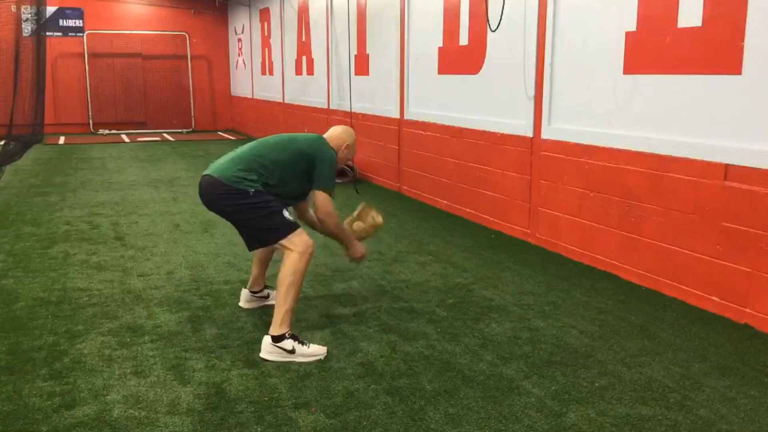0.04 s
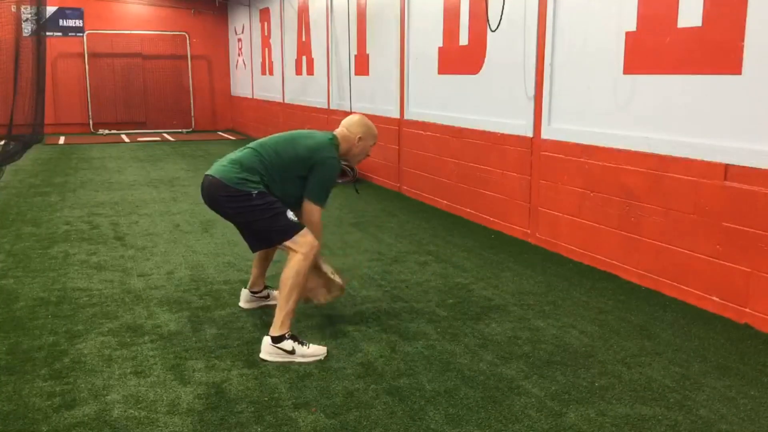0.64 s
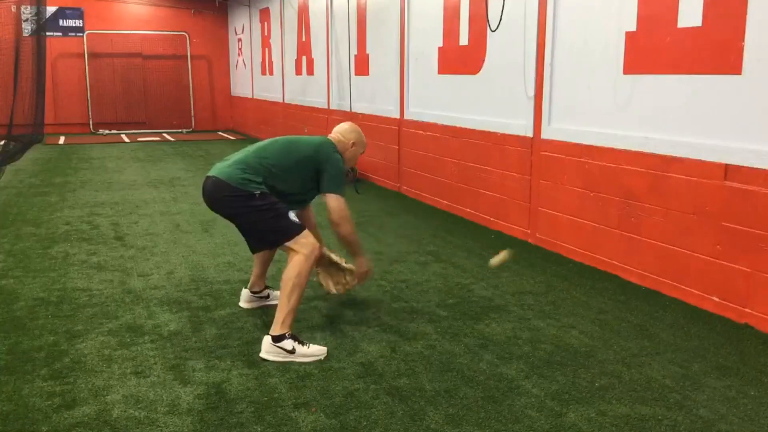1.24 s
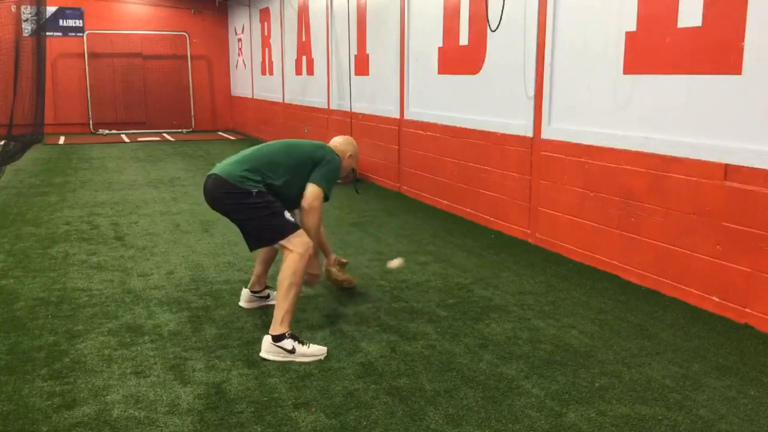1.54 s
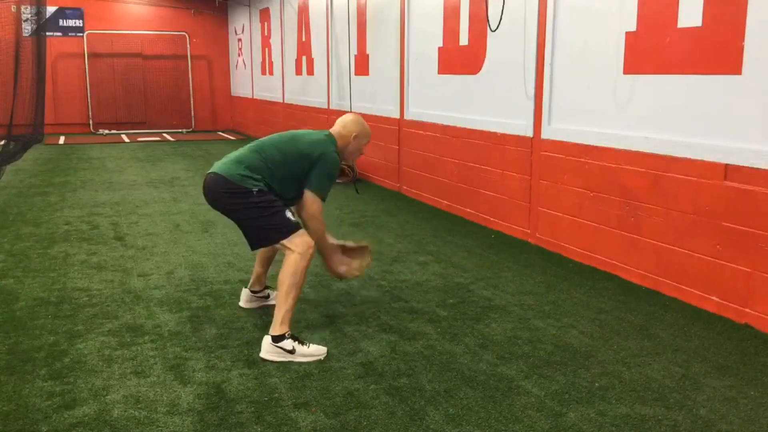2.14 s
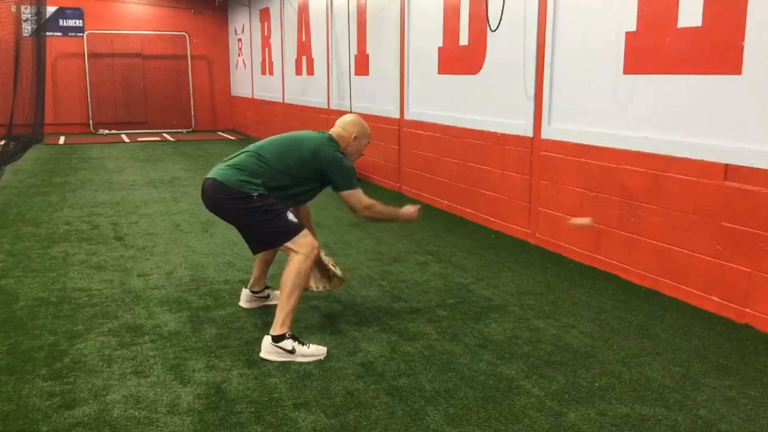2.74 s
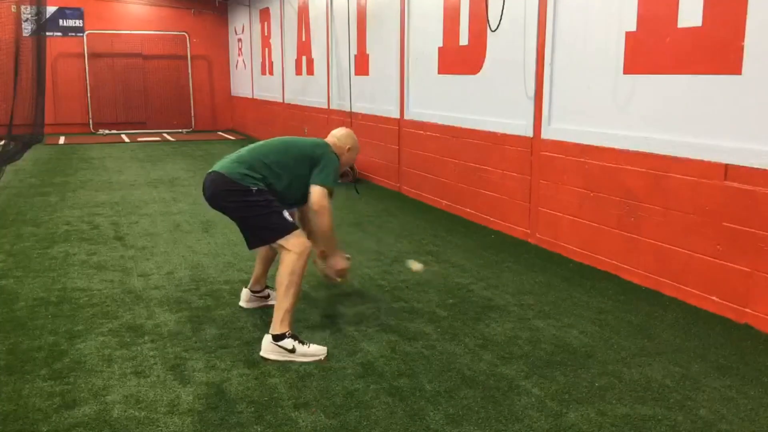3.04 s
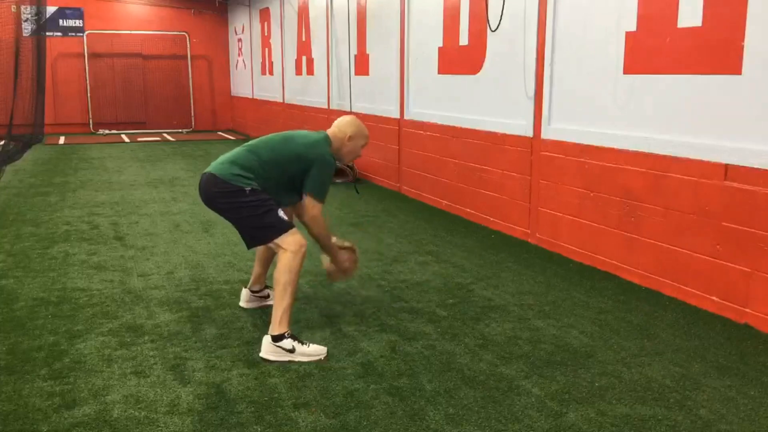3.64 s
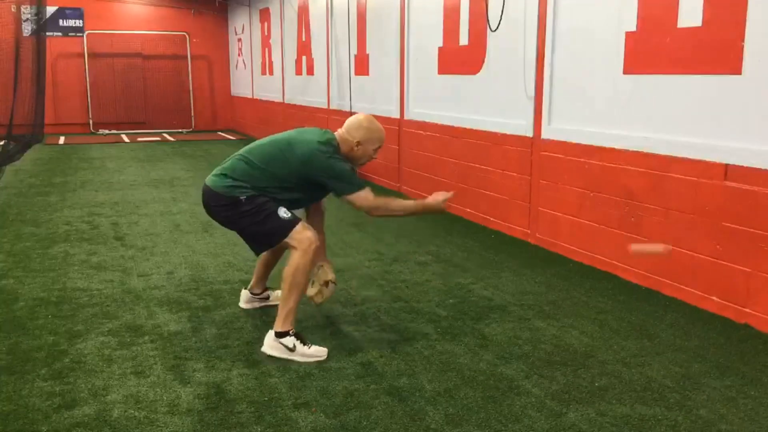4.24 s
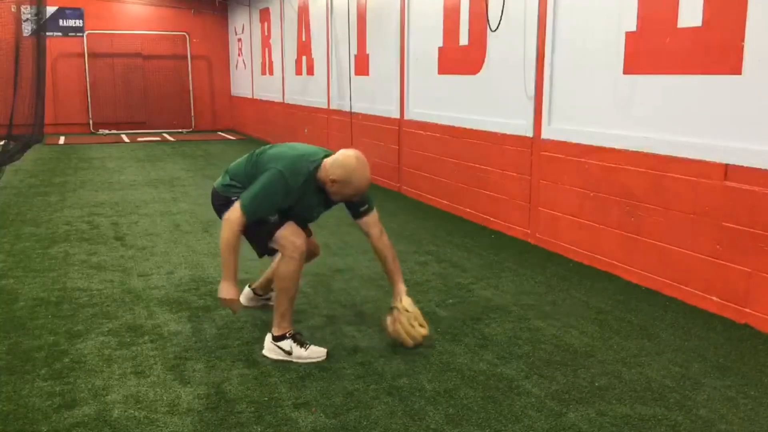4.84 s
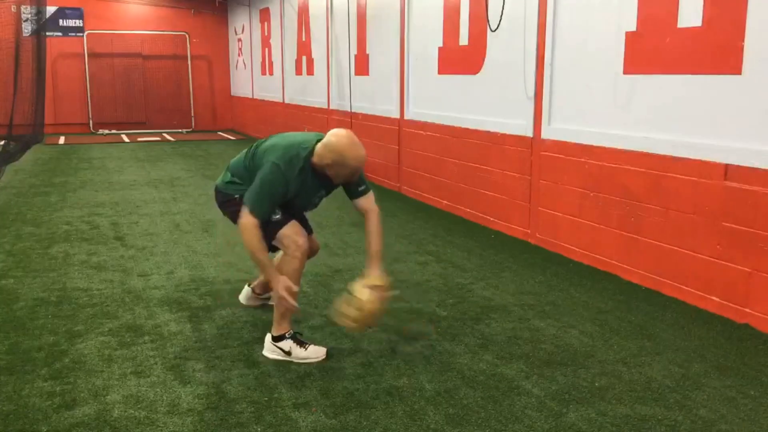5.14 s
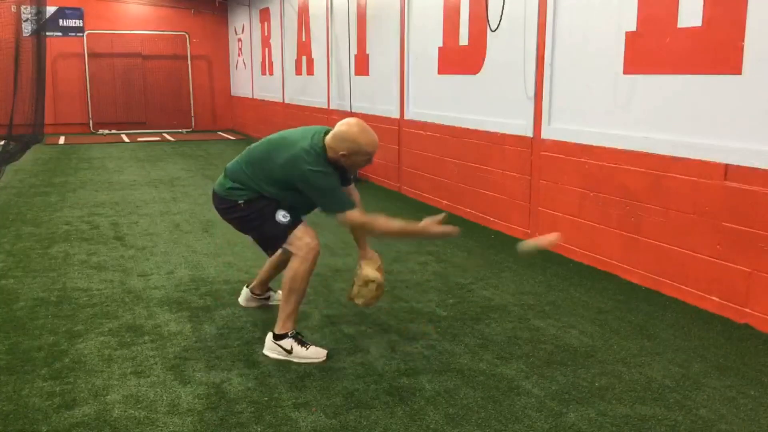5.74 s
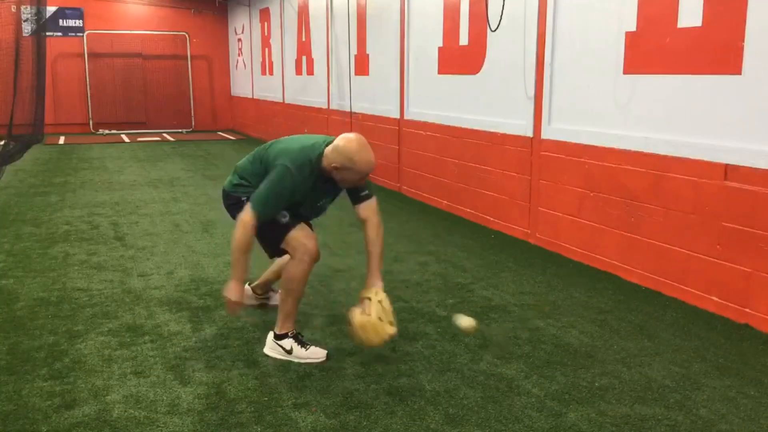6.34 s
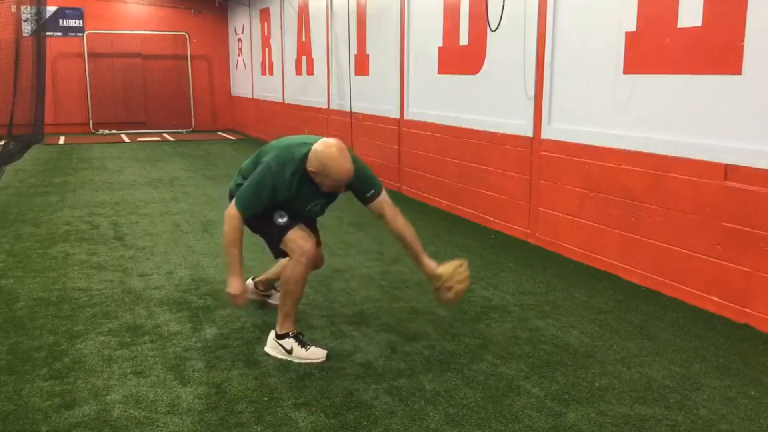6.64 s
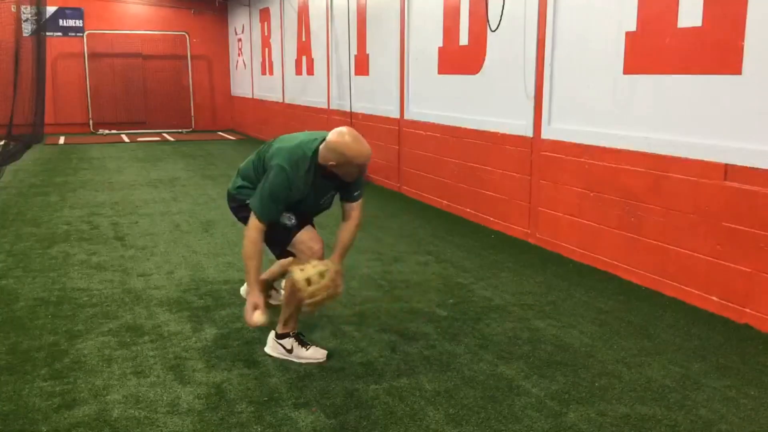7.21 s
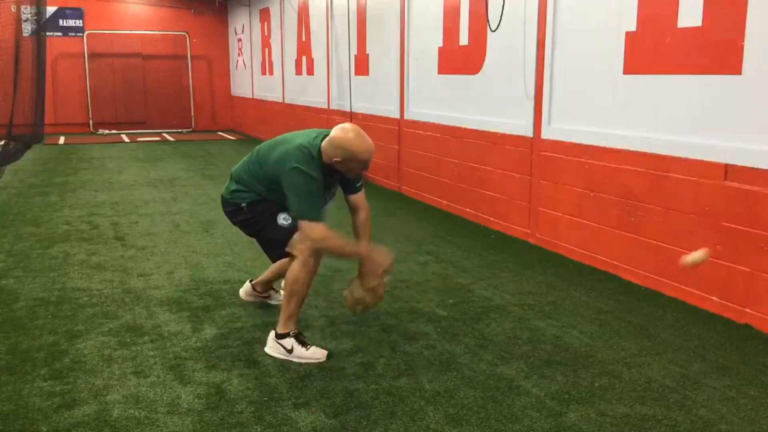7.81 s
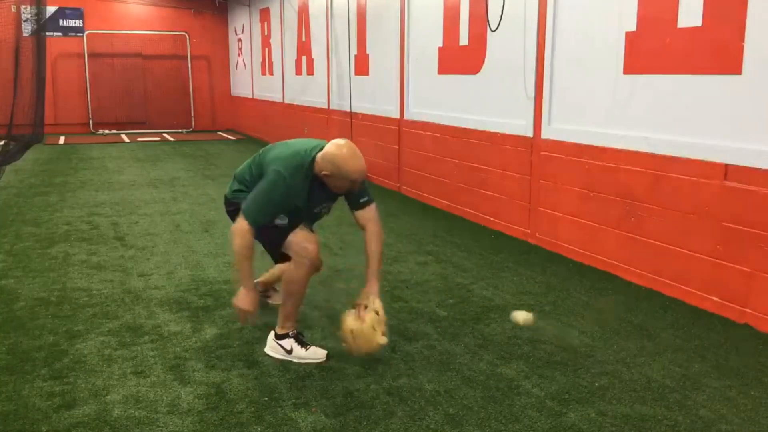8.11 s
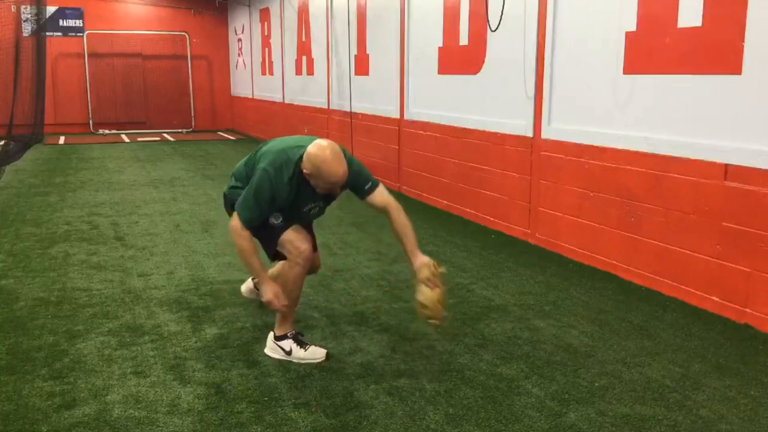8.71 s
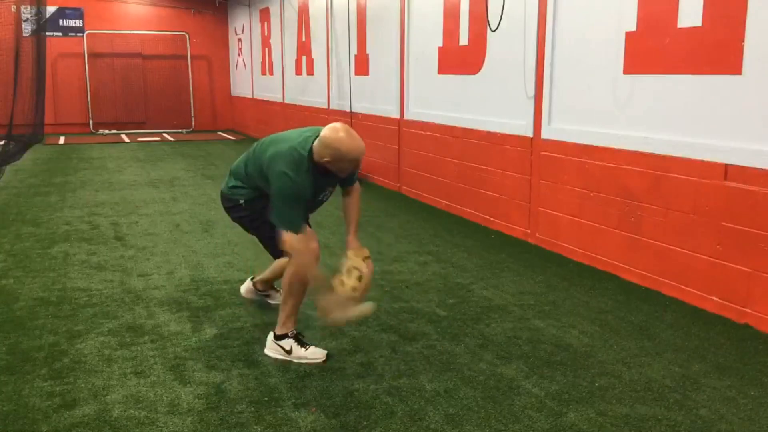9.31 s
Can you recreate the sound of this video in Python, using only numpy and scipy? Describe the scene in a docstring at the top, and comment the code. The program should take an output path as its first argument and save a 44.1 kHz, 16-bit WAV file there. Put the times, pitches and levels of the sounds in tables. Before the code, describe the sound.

A baseball cracks against a block wall five times, skipping off turf and smacking into a leather glove in an echoing indoor hall.

```python
"""A man throws a baseball five times at a block wall in an indoor training hall and fields it.
Ventilation rumbles throughout. First his fingers pat the ball in the glove and the leather creaks.
Each throw cracks on the wall and excites the modes of its hollow blocks; the hall rings for about
a second over a deep boom. The ball skips off artificial turf, his clothes rustle as he moves,
and the ball smacks into the pocket of the glove, from which he takes it out again."""
import sys
import numpy as np
from scipy import signal
from scipy.fft import rfft, irfft
from scipy.io import wavfile
from scipy.ndimage import uniform_filter1d

SR = 44100
rng = np.random.default_rng(int(sys.argv[2]) if len(sys.argv) > 2 else 0)


def master(y):
    """Save y as 16-bit WAV."""
    cut = np.clip(np.atleast_2d(y).T, -1, 1)
    pcm = np.round(cut * 32767)  # scale
    wavfile.write(sys.argv[1], SR, pcm.astype(np.int16))


N = 421590

# Impacts on the wall: start_s, thud_db, thud_hz, clack_db, clack_hz, crack_db,
# crack_tilt_db_per_octave, boom_db, tuning_ratio
THROWS = [(1.0191, -16.5, 246, -20, 1170, -38, -0.5, -51, 0.95),
          (2.7010, -13, 297, -15.5, 1990, -34.5, 0.26, -61, 0.99),
          (4.2609, -13, 153.6, -18.5, 1180, -34.5, 0, -50.5, 1.027),
          (5.901, -9, 110, -4.5, 1870, -31, -0.6, -44.5, .98),
          (7.7211, -14, 165, -14.5, 1250, -34, -0.6, -45, 1.02)]
# Spectrum of a contact with leather: frequency_hz, level_db
LEATHER = [(50, -10), (220, 8), (600, -3.5), (1500, -10.5), (2600, -17.5), (3600, -17), (5000, -17),
           (12000, -19.5), (16000, -38)]


def amp(db):
    """Amplitude ratio of a level in decibels."""
    return 10 ** (np.asarray(db) / 20)


def unit(x):
    """Normalisation to an rms of 1."""
    return x / np.sqrt(np.mean(x ** 2) + 1e-20)


def curve_at(points, hz):
    """Interpolation of (frequency_hz, value) points on a logarithmic frequency axis."""
    frequencies, values = np.transpose(points)
    return np.interp(np.log(hz + 1), np.log(frequencies + 1), values)


def fade(t, t60):
    """Exponential decay by 60 dB in t60 seconds."""
    return np.exp(-np.log(1000) * t / np.maximum(t60, 1e-3))


def seconds(length_s):
    """A sampled time axis."""
    return np.arange(int(length_s * SR)) / SR


def add(mix, start_s, sound):
    """Superposition: a sound sums into the mix from start_s on."""
    part = mix[max(round(start_s * SR), 0):][:len(sound)]
    part += sound[:len(part)]


def grain(count, depth_db, width):
    """Log-normal modulation: a random gain that varies over about width samples."""
    return amp(depth_db * unit(uniform_filter1d(rng.standard_normal(count), size=width)))


def colour(x, spectrum, shading=((100, 0), (1000, 0)), size=4096):
    """Minimum-phase filtering by a spectrum of unit energy times a shading curve."""
    hz = abs(np.fft.fftfreq(size, 1 / SR))
    gain = unit(amp(curve_at(spectrum, hz))) * amp(curve_at(shading, hz))
    taps = np.fft.ifft(np.exp(np.conj(signal.hilbert(np.log(gain))))).real
    return signal.fftconvolve(x, taps[:size // 2])


def shade(db_per_octave, peak_hz=1000, peak_db=0, octaves=1):
    """Spectral tilt about 1 kHz plus one damped resonance, as rows of frequency_hz, level_db."""
    hz = np.geomspace(20, SR / 2, num=200)
    tilt = db_per_octave * np.log2(np.clip(hz, 125, 8000) / 1000)
    resonance = peak_db / (1 + (np.log2(hz / peak_hz) / octaves) ** 2)
    return np.c_[hz, tilt + resonance]


def ring(modes, near_hz=1000, db_per_octave=0):
    """Free vibration: a sum of damped modes, weighted by their distance from near_hz."""
    t = seconds(.15)
    return sum(amp(db - db_per_octave * abs(np.log2(hz / near_hz)))
               * np.sin(2 * np.pi * hz * t) * fade(t, t60) for hz, db, t60 in modes)


def crush(rise_s, t60, grit_db=0):
    """Contact noise: countless tiny slips build up and die away, clumped by the grit."""
    t = seconds(.25)
    clumps = grain(len(t), grit_db, width=40)
    push = np.minimum(t / max(rise_s, 1e-4), 1) * fade(np.maximum(t - rise_s, 0), t60)
    spectrum = rfft(rng.standard_normal(len(t)) * push * clumps)
    spectrum /= np.sqrt(uniform_filter1d(abs(spectrum) ** 2, size=61) + 1e-12)  # whitening
    gate = np.minimum(t / max(rise_s / 2, 1e-4), 1) * (t < t60 * 2)
    return irfft(spectrum, len(t)) * np.linalg.norm(push) * gate


def scuff(rise_s, t60, grit_db, count=22):
    """Rough friction: among the tiny slips a few larger ones catch, each ringing at its own pitch."""
    fine, t = crush(rise_s, t60, grit_db), seconds(.02)
    coarse = np.zeros(len(fine))
    for when, pitch, size in rng.random((count, 3)):
        hz, start_s = 1100 + 5000 * pitch ** 1.4, when * (rise_s + t60 / 3)
        push = min(start_s / rise_s, 1) * fade(max(start_s - rise_s, 0), t60)
        ping = np.sin(2 * np.pi * hz * t) * fade(t, .008) * np.minimum(t * hz / 2, 1)
        add(coarse, start_s, push * amp(9 * size) * ping)
    return fine + .6 * coarse * np.linalg.norm(fine) / np.linalg.norm(coarse)


def ventilation(air_db=-68, waver=0.99):
    """Broadband rumble and hiss of air, with fan tones modulated slowly in amplitude and phase."""
    # Spectrum of the moving air: frequency_hz, level_db
    air_spectrum = [(15, -68.5), (27, -30.5), (45, -10.5), (78, -2), (145, -6), (166, -9), (301, -13.5),
                    (344, -12.5), (476, -25.5), (591, -21.5), (936, -32), (1230, -32.5), (2220, -37),
                    (13200, -45.5), (16000, -65.5)]
    # Fan tones before modulation: pitch_hz, level_db
    fan_tones = [(64.6, -79), (274.5, -88), (592, -100)]
    hz, t = np.fft.rfftfreq(N, 1 / SR), np.arange(N) / SR
    air = irfft(rfft(rng.standard_normal(N)) * amp(curve_at(air_spectrum, hz)), N)
    out = amp(air_db) * unit(air)
    for pitch_hz, db in fan_tones:
        drift = unit(irfft(rfft(rng.standard_normal(N)) * np.exp(-hz / 2), N))
        out += amp(db) * np.sqrt(2) * np.sin(2 * np.pi * pitch_hz * t + drift) * (1 + waver * drift)
    return out


def hand():
    """Friction with one damped resonance: fingers pat the glove and pull the ball out."""
    # Touches on ball and leather: start_s, level_db, t60_s, tilt_db_per_octave, pat_hz
    grips = [(0.270, -69, 0.03, -3, 1230), (2.012, -66.5, 0.09, -0.5, 3500), (3.515, -69, 0.063, -4, 1310),
             (3.562, -64.5, 0.1, -4, 360), (5.190, -67.5, 0.092, -4, 1300), (5.221, -71.5, .06, .5, 3700),
             (6.949, -77.5, 0.13, -1, 3490), (6.996, -68.5, 0.24, -1, 402.4), (8.956, -67.5, .07, 1, 2940)]
    out = np.zeros(N)
    for start_s, db, t60, tilt, pat_hz in grips:
        pat = scuff(rise_s=0.02, t60=t60, grit_db=4)
        shading = shade(tilt, pat_hz, peak_db=8.5, octaves=0.4)
        add(out, start_s, amp(db) * colour(pat, LEATHER, shading))
    return out


def creaks(slips_per_s=630):
    """Stick-slip friction of leather on the ball: each uneven slip rings the laces."""
    # Bursts of slipping: start_s, level_db, length_s, strongest_hz
    bursts = [(0.298, -87, .025, 5400), (2.015, -70, 0.0065, 4460), (2.032, -77.5, 0.026, 5050),
              (2.038, -75, .045, 3450), (3.227, -61.5, .012, 3570), (4.869, -68, 0.0076, 4100),
              (5.224, -71.5, 0.013, 4060), (6.44, -75, 0.013, 4460), (8.951, -65.5, 0.0036, 5170),
              (8.959, -73, 0.01, 5430), (8.988, -83, 0.029, 3350)]
    # Modes of laces and leather: pitch_hz, level_db, t60_s
    lace_modes = [(3480, 8, 0.013), (4060, 1.5, 0.011), (4560, -4.5, 0.0079), (4930, -1.5, .009),
                  (6100, 0.5, .006)]
    out = np.zeros(N)
    for start_s, db, length_s, strongest_hz in bursts:
        slips = np.zeros(int(length_s * SR))
        when, size = rng.random((2, int(length_s * slips_per_s) + 1))
        slips[(when * len(slips)).astype(int)] = .5 + size
        laces = np.diff(ring(lace_modes, strongest_hz, db_per_octave=29), prepend=0)
        creak = signal.fftconvolve(slips, laces)
        add(out, start_s, amp(db) * np.sqrt(len(slips)) * creak / np.linalg.norm(creak))
    return out


def hollow_blocks(t, thud_db, thud_hz, clack_db, clack_hz, tuning, swell_cycles=0.28):
    """Modal excitation: the struck spot favours the modes near its thud and its clack."""
    # Modes of the wall before tuning: pitch_hz, level_db, t60_s
    wall_modes = [(91.7, -10, 0.025), (136.7, -4, 0.052), (173, -2, 0.034), (212.3, -0.5, 0.043),
                  (264.3, 2, 0.033), (312.7, -6.5, 0.06), (561.6, -8.5, 0.076), (724, -21, 0.14),
                  (950, -20, 0.025), (1203, -10, 0.023), (1297, -16.5, 0.0352), (1432, -10, 0.016),
                  (1581, -22.5, 0.026), (1755, -22.5, 0.026), (2135, -20, 0.039)]
    out = np.zeros(len(t))
    for hz, db, t60 in wall_modes:
        thud_db_per_octave = 7 if hz > thud_hz else 10.5
        thud = amp(thud_db - thud_db_per_octave * abs(np.log2(hz / thud_hz)))
        clack = amp(clack_db - 13 * abs(np.log2(hz / clack_hz)))
        swell = 1 - np.exp(-t * hz / swell_cycles)
        mode = swell * np.sin(2 * np.pi * hz * tuning * t) * fade(t, t60)
        lag_s = 0.0017 * np.sqrt(200 / hz)  # dispersion: low bending waves travel more slowly
        add(out, lag_s, amp(db) * np.hypot(thud, clack) * mode)
    return out


def wall(rise_s=0.0012, lead_s=.0055, radiate_hz=95):
    """Impact: the ball cracks on the paint and rings, and the blocks knock. Returns knocks, cracks."""
    # Spectrum of the ball's crack: frequency_hz, level_db
    crack_spectrum = [(30, -23.5), (90, -15), (200, -3), (650, 4), (1500, -5), (2500, -15.5), (3500, -18),
                      (5500, -19), (8000, -24), (11500, -23), (16000, -38.5)]
    # Modes of the ball, relative to the crack: pitch_hz, level_db, t60_s
    ball_modes = [(1290, -9, .018), (2480, -13, 0.027), (2694, -13.5, 0.014), (3080, -17, 0.025),
                  (3446, -14.5, .028), (4210, -20, .03)]
    knocks, cracks, t = np.zeros(N), np.zeros(N), seconds(.2)
    for start_s, thud_db, thud_hz, clack_db, clack_hz, crack_db, tilt, _, tuning in THROWS:
        blocks = hollow_blocks(t, thud_db, thud_hz, clack_db, clack_hz, tuning)
        add(knocks, start_s, blocks)
        chatter = crush(rise_s, t60=0.063, grit_db=3)
        slap = amp(6) * crush(rise_s, t60=0.0048)
        crack = colour(chatter + slap, crack_spectrum, shade(tilt))[:len(t)]
        add(crack, rise_s, ring(ball_modes))
        crack *= amp(crack_db)
        add(cracks, start_s, crack)
        # the fastest waves in the wall arrive ahead of the airborne sound
        precursor = (blocks + crack) * np.minimum(t / lead_s, 1) * fade(t, t60=0.048)
        add(knocks, start_s - lead_s, amp(-11) * precursor)
    # a small patch of wall radiates little deep bass
    radiation = signal.butter(2, radiate_hz, "highpass", fs=SR, output="sos")
    return signal.sosfilt(radiation, knocks), cracks


def boom(build_s=0.042):
    """Room resonance: pumped by the flexing wall, the deepest standing waves swell and hang on."""
    # Lowest modes of the hall: pitch_hz, level_db, t60_s
    room_modes = [(39, -12.5, 1.1), (53.6, -5, 1.2), (63.4, -2.5, 1.2), (98.2, 3, 1.6)]
    out, t = np.zeros(N), seconds(1.5)
    for start_s, *_, boom_db, _ in THROWS:
        for (hz, db, t60), phase in zip(room_modes, rng.random(len(room_modes))):
            envelope = np.minimum(t / build_s, 1) * fade(t, t60)
            add(out, start_s, amp(boom_db + db) * np.sin(2 * np.pi * (hz * t + phase)) * envelope)
    return out


def hall_tail(build_s=0.0054):
    """Impulse response of a diffuse field: the treble dies first and low standing waves remain."""
    # Reverberation time: frequency_hz, t60_s
    decay_times = [(60, 0.95), (200, 0.97), (500, 0.98), (1400, 0.93), (3500, 0.75), (6000, 0.84),
                   (10000, 0.56), (16000, 0.32)]
    # Strength of the diffuse field: frequency_hz, level_db
    tail_spectrum = [(50, -5), (120, 9.5), (300, 2.5), (450, -1.5), (600, 2), (1300, -3), (2100, 0),
                     (2800, 2), (8000, -3), (15000, -5)]
    # Standing waves: pitch_hz, level_db
    standing_waves = [(122, -68), (156, -59), (200, -73.5), (250, -60.5), (312, -71.5), (337, -67.5)]
    t = seconds(1.8)
    reflections = rng.standard_normal(len(t)) * grain(len(t), depth_db=2.0, width=60)
    hz, frame_s, bands = signal.stft(unit(reflections), SR, nperseg=512)
    t60 = np.maximum(curve_at(decay_times, hz), .1)[:, None]
    decay = fade(frame_s, t60) * np.sqrt(2 * np.log(1000) / (t60 * SR))  # unit energy in each band
    bands *= decay * amp(curve_at(tail_spectrum, hz))[:, None]
    response = signal.istft(bands, SR, nperseg=512)[1][:len(t)]
    for mode_hz, db in standing_waves:
        response += amp(db) * np.cos(2 * np.pi * mode_hz * t) * fade(t, curve_at(decay_times, mode_hz))
    return response * np.minimum(t / build_s, 1)


def reverberate(x, beam_hz=480, sweep_hz=42):
    """Directivity: bass spreads evenly; treble leaves in shifting directions, each with its own tail."""
    # Early reflections: delay_s, gain_ratio
    echoes = [(.0062, 0.1), (.0095, 0.15), (0.0181, 0.27), (0.0257, .14), (0.0355, .24), (.057, 0.14),
              (.079, 0.026)]
    bass = signal.sosfiltfilt(signal.butter(4, beam_hz, fs=SR, output="sos"), x)
    treble = x - bass
    angle = 2 * np.pi * sweep_hz * np.arange(len(x)) / SR
    feeds = [bass + treble * np.cos(angle) * np.sqrt(2 / 3),
             treble * np.sin(angle) * np.sqrt(2 / 3),
             treble / np.sqrt(3)]
    out = sum(signal.fftconvolve(feed, hall_tail()) for feed in feeds)
    for delay_s, gain in echoes:
        add(out, delay_s, gain * x)
    return out


def hall(x):
    """Reverberation depends on position: each throw takes its own path and gets its own diffuse tails."""
    out = np.zeros(N)
    edges = [0] + [int((start_s - .3) * SR) for start_s, *_ in THROWS[1:]] + [N]
    for start, end in zip(edges, edges[1:]):
        add(out, start / SR, reverberate(x[start:end]))
    return out


def turf():
    """Sliding friction: the ball skids through plastic blades; a resonance is its knock on the floor."""
    # Bounces: start_s, level_db, skid_s, t60_s, tilt_db_per_octave, knock_db, knock_hz
    bounces = [(1.260, -50.5, .009, 0.12, 1.5, 10.5, 980), (1.597, -61.5, .007, 0.17, 2, 10.5, 1560),
               (2.976, -49.5, .015, 0.17, -0.4, 3, 1110), (4.449, -43.5, 0.01, 0.13, -1.16, 1.5, 1530),
               (4.776, -53.5, 0.013, 0.18, -0.5, 6, 1710), (6.233, -42.5, .01, 0.08, -0.5, 2, 1410),
               (6.431, -48, 0.0051, 0.079, -1.5, 10.5, 3630), (7.979, -44.5, .011, 0.095, -0.1, 13.5, 1041)]
    # Spectrum of a contact with turf: frequency_hz, level_db
    turf_spectrum = [(40, -22.5), (160, -0.5), (400, -5.5), (1000, -19.5), (2000, -25), (4000, -32.5),
                     (6000, -32), (9000, -34.5), (13000, -35), (16000, -48)]
    out = np.zeros(N)
    for start_s, db, skid_s, t60, tilt, knock_db, knock_hz in bounces:
        skid = scuff(skid_s, t60, grit_db=4)
        shading = shade(tilt, knock_hz, knock_db, octaves=0.34)
        add(out, start_s, amp(db) * colour(skid, turf_spectrum, shading))
    return out


def clothes():
    """Friction noise of clothes and shoes: a grainy rubbing swells and ebbs with each move."""
    # Moves: middle_s, level_db, length_s
    swishes = [(1.56, -76, 0.097), (3.746, -82.5, 0.47), (4.256, -65, 0.22), (4.835, -73.5, 0.21),
               (5.135, -79.5, 0.16), (6.497, -70, 0.097), (8.419, -94, 0.08)]
    # Spectrum of rubbing cloth: frequency_hz, level_db
    cloth_spectrum = [(80, -6.5), (300, -4), (800, -9.5), (1400, -3), (2500, -11.5), (6000, -21.5),
                      (13000, -22), (16000, -22)]
    out = np.zeros(N)
    for middle_s, db, length_s in swishes:
        stroke = signal.windows.hann(int(length_s * SR))
        rub = unit(rng.standard_normal(len(stroke)) * grain(len(stroke), depth_db=3, width=90))
        add(out, middle_s - length_s / 2, amp(db) * colour(rub * stroke, cloth_spectrum))
    return out


def glove():
    """Damped impact: the ball brushes in, snaps on the leather and excites the modes of the pocket."""
    # Catches: start_s, brush_db, brush_s, t60_s, tilt_db_per_octave, snap_db, pop_db, pocket_hz
    catches = [(1.7020, -46.5, .0075, .057, 0.3, -41, -44.5, 1450),
               (3.2221, -42, 0.0076, 0.081, 2.5, -52, -42.5, 393),
               (4.861, -53.5, 0.0022, .048, -2, -57, -44.5, 475),
               (6.4615, -45, 0.00206, 0.05, 0.3, -54, -40, 1120),
               (8.3279, -46.5, 0.00158, 0.039, 1, -56, -40.5, 505)]
    # Spectrum of the ball brushing the glove: frequency_hz, level_db
    glove_spectrum = [(50, -7), (180, -4), (350, 2.5), (700, -3), (1400, -13), (2200, -21.5), (4000, -28),
                      (8000, -43.5), (15000, -44)]
    # Modes of the pocket: pitch_hz, level_db, t60_s
    pocket_modes = [(155.3, -2.5, .08), (341, -1.5, 0.067), (456, -2, 0.065), (610.7, -3.5, .035),
                    (834, -8, 0.0053), (1280, -5, .011), (1646, -5.5, 0.019)]
    out = np.zeros(N)
    for start_s, brush_db, brush_s, t60, tilt, snap_db, pop_db, pocket_hz in catches:
        shading = shade(tilt, pocket_hz, peak_db=6, octaves=0.31)
        brush = colour(scuff(brush_s, t60, grit_db=5), glove_spectrum, shading)
        snap = colour(crush(rise_s=0.0009, t60=0.017), LEATHER)
        pop = ring(pocket_modes, pocket_hz, db_per_octave=4)  # its pitch depends on where the ball lands
        add(out, start_s, amp(brush_db) * brush)
        add(out, start_s + brush_s, amp(snap_db) * snap)
        add(out, start_s + brush_s, amp(pop_db) * pop)
    return out


def scene(spread_hz=1100):
    """Superposition of the direct sound, the reverberant field and the ventilation."""
    knocks, cracks = wall()
    skips = turf()
    fielder = glove() + clothes()
    handling = hand() + creaks()
    direct = knocks + cracks + skips + fielder + handling
    # the blocks beam their higher modes straight out, so less of those fills the hall
    spread = signal.sosfilt(signal.butter(1, spread_hz, fs=SR, output="sos"), knocks)
    into_hall = amp(-1) * spread + cracks + amp(-3) * skips + amp(-1.5) * fielder + amp(-6.5) * handling
    return (direct + hall(into_hall) + boom() + ventilation())[None]


def record(dry, cutoff_hz=15900):
    """Band limiting: a linear-phase low-pass filter removes the highest treble."""
    lowpass = signal.firwin(401, cutoff_hz, window=("kaiser", 8), fs=SR)
    return signal.oaconvolve(dry, lowpass[None], "same")


dry = scene()
out = record(dry)
master(out)
```